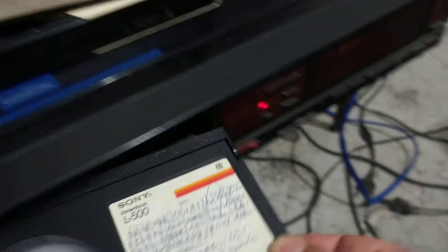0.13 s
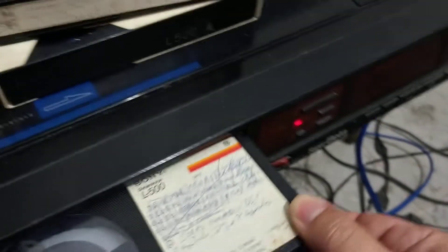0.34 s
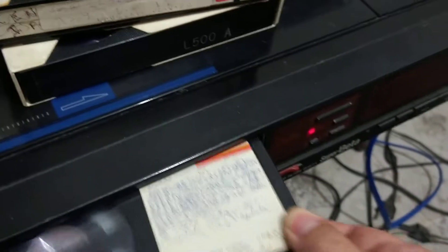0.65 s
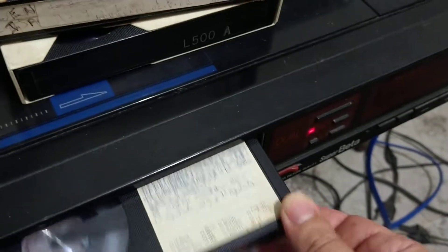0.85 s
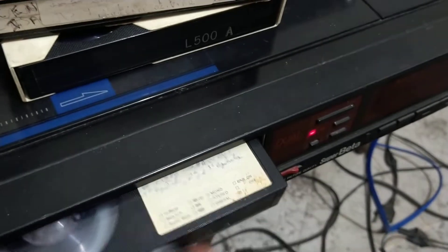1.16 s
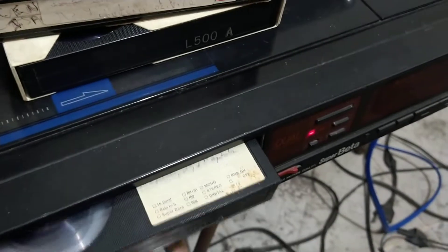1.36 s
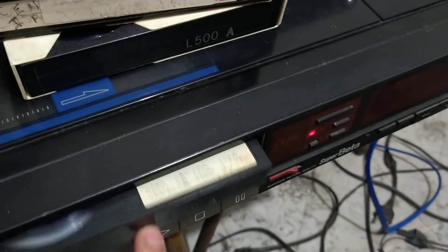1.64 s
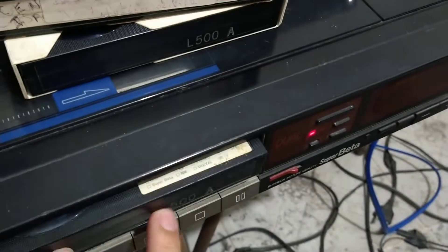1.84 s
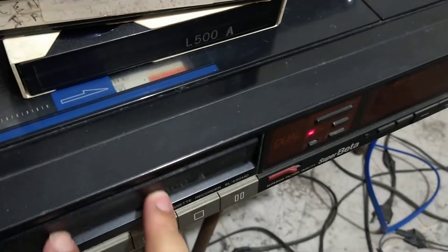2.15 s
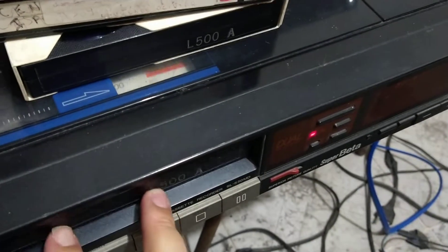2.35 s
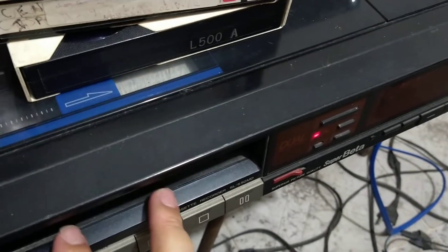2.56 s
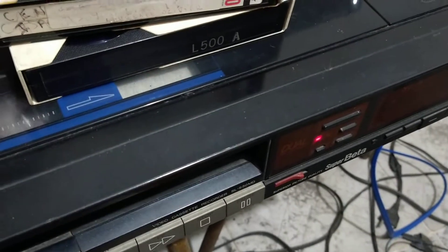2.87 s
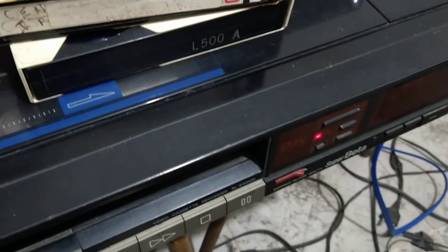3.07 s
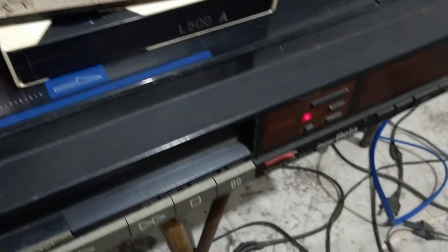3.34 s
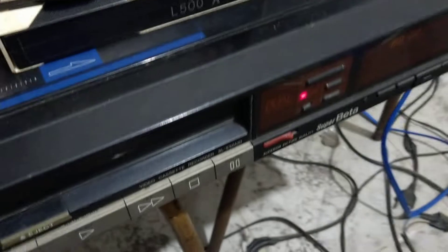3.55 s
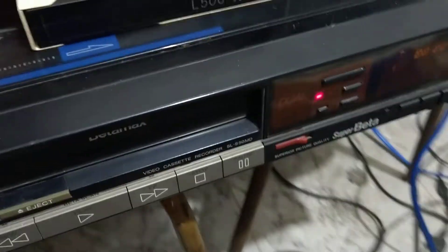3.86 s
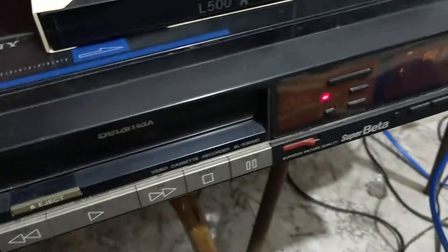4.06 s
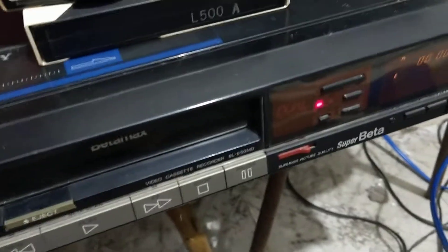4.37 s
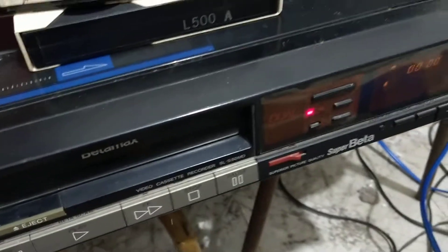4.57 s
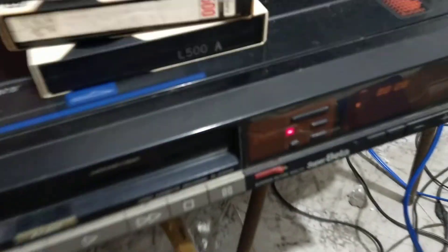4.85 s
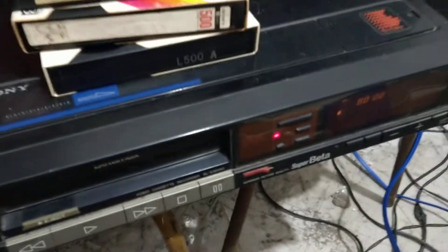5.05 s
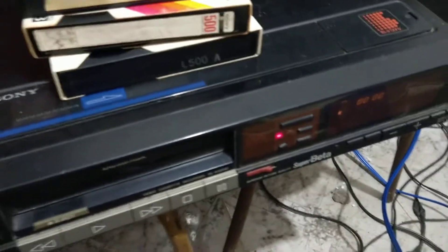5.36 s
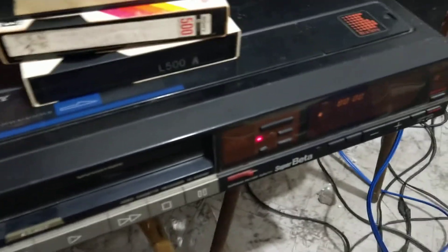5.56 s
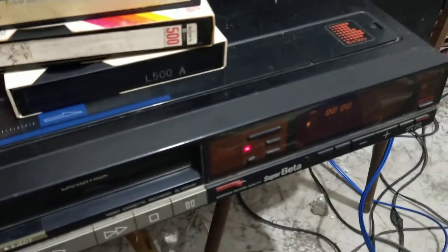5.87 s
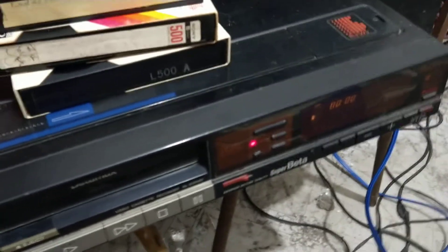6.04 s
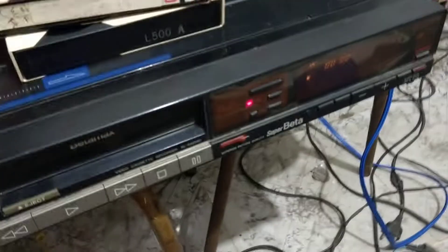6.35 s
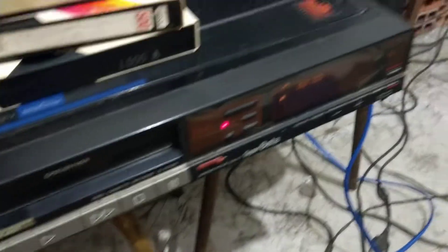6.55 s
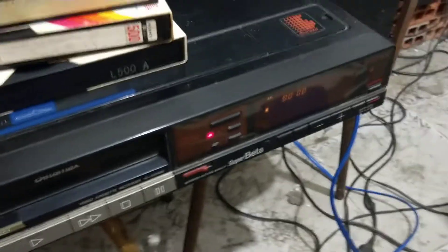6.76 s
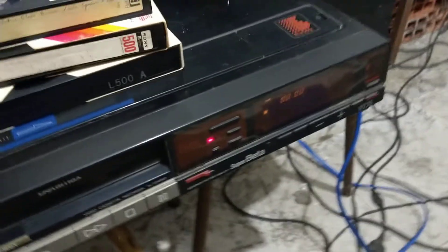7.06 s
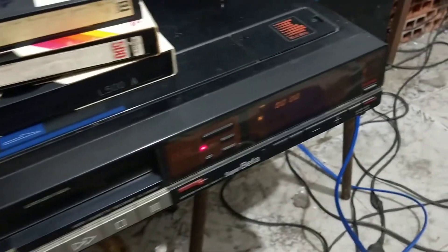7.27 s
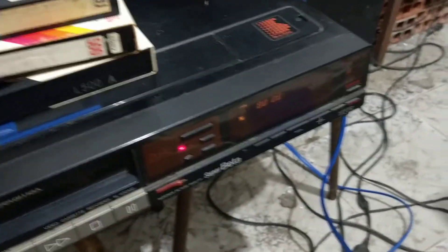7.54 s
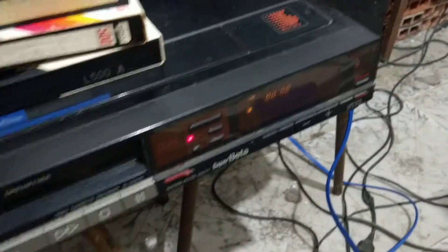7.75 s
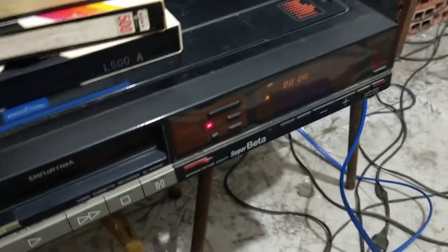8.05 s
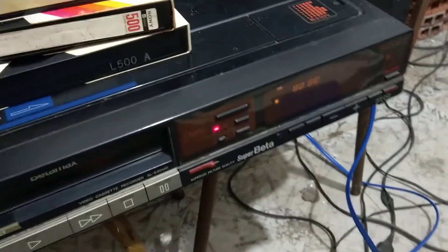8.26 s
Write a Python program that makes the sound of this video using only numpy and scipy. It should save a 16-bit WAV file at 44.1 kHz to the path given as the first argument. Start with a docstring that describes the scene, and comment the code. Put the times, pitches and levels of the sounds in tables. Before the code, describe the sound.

Close up, plastic knocks and scrapes, a firm clunk, a rattling motor whir, hard clacks, then two quieter geared whirs and small ticks.

```python
"""A small room with a tape machine: a hand slides a plastic cassette in, and it knocks on the flap and guides.
A lift motor draws it in, then a threading motor whirs twice through its gears, with latches clacking between.
Blows ring banks of resonances; rubbing, brushes and gears are modulated noise; meshing teeth are gliding tones.
A low throbbing hum lies behind. Two microphone ports hear the machine, the left one louder in most bands."""
import sys
import numpy as np
from scipy.fft import rfft, irfft, next_fast_len
from scipy.io import wavfile
from scipy.ndimage import map_coordinates

SR = 44100
rng = np.random.default_rng(int(sys.argv[2]) if len(sys.argv) > 2 else 0)


def store_wav(level_fs):
    """Save 16-bit WAV to argv[1]."""
    pcm = np.round(np.clip(np.atleast_2d(level_fs), -1, 1) * 32767)
    wavfile.write(sys.argv[1], SR, pcm.T.astype(np.int16))


N = 370881

# Blows of cassette, flap, levers and latches. Each row: start in seconds, level in dB, thud trim in dB,
# snap trim in dB, rattle in dB re the first crack.
BLOWS = [ (.001, -37.5, 1.5, -7, -7), (.061, -30.5, 7, -2, -12.5), (0.069, -23.5, -7, 3, -4.5),
         (0.245, -37, 9, -11, -5.5), (.312, -27.5, 8, -12, -14), (0.415, -26.5, -1.5, -1, -11),
         (0.453, -55.5, 20.5, 1, -33), (0.626, -35.5, 10, -8, -13), (0.65, -28.5, 4.5, -5.5, -8.5),
         (0.721, -32, 0, -7.5, -1), (.75, -37, 9, -5, -11), (.765, -43, 15, -10, -22),
         (.843, -43, 4, -4, -12), (.89, -38, 2.5, -26, -4.5), (1.025, -32, 6, -13, -13),
         (1.298, -46, 2, 3, -8), (1.657, -43, -17, -1, -8), (1.701, -32, -4, -2.5, -4.5),
         (1.716, -43, 16, -6, -28), (1.737, -34.5, 0, 1, -2.5), (1.7447, -14, -3, -9.5, -16.5),
         (1.999, -49.5, 2.5, 7, -16.5), (2.176, -46.5, 1, -9, 0), (2.799, -24, -3, 7, -9.5),
         (2.966, -35.5, 8, 2, 5), (3.013, -26, 7, -1, -4.5), (3.16, -29, 5.5, -6, -11),
         (3.193, -29.5, 9, -18, -17.5), (3.296, -22.5, -3, 8, -11), (3.347, -44, 8.5, 4.5, 2.5),
         (3.447, -57, -11, 8, -8), (3.727, -49, 0, -6, -3), (3.879, -48, -9, -0.5, -5.5),
         (3.964, -43.5, -7.5, 2.5, 6.5), (3.99, -37, -10, 8.5, -7), (4.657, -28.5, -30, 10.5, -14),
         (5.153, -17.5, -4.5, 9, -5), (5.38, -51, -2, 4, 8), (6.136, -42, 0, -5.5, 3.5),
         (6.6, -41.5, 0, -3, 1.5), (6.94, -50, -0.5, -6.5, -1), (7.211, -60.5, -11, -9, 12),
         (7.327, -46.5, -2, -6, 2), (7.516, -47, -7.5, 4.5, 4.5), (7.543, -36.5, -1, 8, -8.5),
         (7.552, -34.5, -4.5, 6, -5), (7.748, -33, -7, 0, 2), (7.771, -37, 0, 4.5, -8.5),
         (8.025, -50, 11, -25, -4)]
# Modes a blow rings. Each row: centre in Hz, width in Hz, level in dB.
CABINET_MODES = [(182, 80, -11.5), (404, 147, -2.5), (503, 77, 0), (691, 154, 1), (807, 207, 3),
                 (1075, 360, -7.5)]
SHELL_MODES = [(1405, 700, -1), (1846, 540, 4.5), (2440, 1150, -1.5), (3077, 180, 1), (4540, 2800, -9.5)]
CHASSIS_MODES = [(5640, 1300, -12.5), (7860, 2700, 1.5), (9520, 3240, 0), (9840, 1930, 2),
                 (13400, 10000, -14.5)]
SHELL_RATTLE_T60_S = 0.26  # for a rattle of 0 dB or more
LIFE_DB_PER_RATTLE_DB = 0.32

# Plastic sliding on plastic. Each row: start, peak and end in seconds, hiss in dB, body in dB re hiss.
STROKES = [(0.17, 0.27, 0.5, -57, 13.5), (0.842, 0.913, 1.04, -63, 17), (0.855, 1.022, 1.08, -49, -5),
           (1.19, 1.293, 1.46, -58.5, 1), (1.34, 1.372, 1.482, -41.5, -35), (1.481, 1.54, 1.6, -48, -11.5),
           (1.593, 1.7, 1.75, -50, -6), (6.9, 7.075, 7.22, -78, 24), (7.842, 8.148, 9.2, -66, -21)]
STROKE_FADE_DB = 23.5  # start and end under the peak
# Sliding spectra. Each row: frequency in Hz, relative level in dB per Hz.
SLIDE_HISS_SPECTRUM = [(1470, -23.5), (2920, -18), (4240, -13), (7530, -14.5), (9150, -8.5), (16000, -24.5)]
SLIDE_BODY_SPECTRUM = [(88, -42.5), (150, -2), (506, -3.5), (692, 0.5), (2300, -14), (4300, -40),
                       (6600, -120)]

# Motor runs; the threading motor goes out and back. Each row: on and off in seconds, brush hiss in dB,
# gear rattle in dB, spin-up in seconds, coasting in dB per second.
LIFT_RUNS = [(2.155, 3.29, -35.5, -39, 0.077, 159.5)]
THREAD_RUNS = [(3.98, 5.15, -39, -44, 0.076, 339), (5.375, 6.58, -42.5, -45.5, 0.066, 337)]
# Motor spectra. Each row: frequency in Hz, relative level in dB per Hz.
LIFT_HISS_SPECTRUM = [(2940, -25.5), (5000, -23), (6570, -6.5), (8380, -2.5), (9190, -7), (10200, -2.5),
                      (12800, -17.5), (16000, -27)]
LIFT_GEAR_SPECTRUM = [(120, -35), (280, -15.5), (400, -5), (2400, -7), (3450, -17), (5500, -18.5),
                      (7500, -62.5)]
THREAD_HISS_SPECTRUM = [(3500, -50.5), (5600, -19), (6600, -9), (9200, -7), (10050, -2), (10900, -7.5),
                        (11600, -2.5), (12300, -16.5), (13300, -22), (16000, -34.5)]
THREAD_GEAR_SPECTRUM = [(120, -28), (270, -16.5), (400, -15.5), (900, -7), (2900, -12), (3450, -19.5),
                        (5500, -21), (7500, -63.5)]
# Gearbox resonances, added to the plain rattle. Each row: centre in Hz, width in Hz, level in dB.
LIFT_BOX_MODES = [(1030, 45, 3), (1596, 66, 2.5), (1830, 40, 5.5), (2170, 32, 5)]
THREAD_BOX_MODES = [(395, 54, 7.5), (480, 58, 4.5), (784, 30, 6), (886, 42, 8), (998, 34, 7), (1398, 24, 6),
                    (1832, 32, 4.5)]
# Resonances that come and go as the carriage travels. Each row: centre in Hz, width in Hz,
# list of (time in seconds, level in dB).
CARRIAGE_RINGS = [(2200, 490, [(2.4, -24), (2.72, 2), (2.95, -1), (3.15, -20)]), (9950, 1400, [(2.85, -24),
                  (3.0, -1.5)]), (12600, 870, [(2.35, -15), (2.7, 5), (2.9, -14)])]
SHAFT_MEAN_HZ = 66.3
SWITCH_ON_DB, GEAR_DB_PER_HISS_DB = -19, 0.82  # hiss at switch-on re full speed; rattle follows
COAST_S = .5  # time until still

# Motor speed as tooth-mesh pitch. Each row: time in seconds, pitch in Hz, whine in dB before its swells.
LIFT_MESH = [(2.156, 1102, -77), (2.42, 1291, -53.5), (2.67, 1161, -50), (2.949, 1056, -49.5),
             (3.17, 1169, -55), (3.27, 1045, -48), (3.35, 801, -54.5), (3.41, 770, -46), (3.47, 700, -70)]
THREAD_MESH = [(4.15, 890, -72), (5.149, 857, -71), (5.41, 762, -64.5), (5.485, 783, -73),
               (5.517, 793.4, -55.5), (5.549, 850, -73), (5.63, 870, -59.5), (5.71, 888, -67),
               (5.8, 876, -57.5), (5.98, 867, -58.5), (6.03, 804, -53), (6.09, 891, -70), (6.3, 983, -66),
               (6.44, 958, -62), (6.56, 901, -52)]
# Panels that sing as the mesh passes, added to the plain tone. Each row: centre in Hz, width in Hz, level in dB.
PANEL_MODES = [(785, 16, 17), (880, 30, 19), (975, 60, 9), (1700, 170, 13), (2230, 280, 21)]
BEAD_HZ, BEAD_CREST_S = 16, 5.64  # swells of the whine

# Knocks on a small flap spring. Each row: start in seconds, level in dB.
SPRING_PINGS = [(0.727, -35), (0.844, -43), (1.025, -36.5), (3.297, -28)]
# The cassette drags over the spring. Row: start, peak and end in seconds, level in dB.
SPRING_DRAG = (.8, .97, 1.12, -59)
SPRING_HZ, SPRING_T60_S = (4240, 4400), .06  # pair of modes, before detuning

# Low hum. Each row: time in seconds, level in dB before its throb.
HUM_LEVELS = [(0, -62), (2.0, -65), (3.3, -58.5), (3.9, -66.5), (4.6, -57), (5.3, -83.5)]
HUM_MEAN_HZ = 82.3
THROB_HZ, THROB_DIP_S = 2.44, .22  # rate, one dip
# Background spectra. Each row: frequency in Hz, relative level in dB per Hz.
RUMBLE_SPECTRUM = [(25, -57.5), (60, -13.0), (150, -15.0), (600, -57.0)]
ROOM_SPECTRUM = [(25, -46), (60, -7), (120, 2), (220, -9), (450, 1), (600, -8), (1900, -12.5), (5200, -19),
                 (10000, -14.5), (16000, -35.5)]
ROOM_MEAN_DB = -66.5

# The ports. Each row: frequency in Hz, left-right correlation.
PORT_LIKENESS = [(60, 0.77), (250, 1), (1000, 0.29), (2000, 0.18), (12000, 0.095)]
# Each row: frequency in Hz, left re right in dB.
PORT_BALANCE = [(200, 1.2), (700, 1.5), (2000, 6.5), (4400, 0), (8100, -0.5), (15000, 10.5)]
RIGHT_LAG_SAMPLES, TOP_HZ = 10, 16000


def contacts():
    """Each blow is a crack, a burst of chatter and a longer rattle, ringing cabinet, shell and chassis."""
    size = 2 ** 14
    out, t_s, hz = np.zeros((2, N + size)), np.arange(size) / SR, np.fft.rfftfreq(size, 1 / SR)
    banks = [resonances(modes, hz) for modes in (CABINET_MODES, SHELL_MODES, CHASSIS_MODES)]
    bounce = amp(1.6 * wobble(260)) * pair()  # loose parts
    bounce = np.pad(bounce, ((0, 0), (0, size)))
    chatter = amp(-60 * t_s / 0.021)
    for start_s, db, thud_db, snap_db, rattle_db in BLOWS:
        i = round(start_s * SR)
        rise_s = 0.0031 * amp(0.63 * rattle_db)  # rattling blows build up slower
        onset = 1 - np.exp(-t_s / rise_s)
        rattle_t60_s = SHELL_RATTLE_T60_S * amp(LIFE_DB_PER_RATTLE_DB * min(rattle_db, 0))
        ring = 0
        bank_db = (thud_db - 6.5, -6, snap_db - 5.5)
        for bank, part_db, life in zip(banks, bank_db, (1.2, 1.0, .9)):  # the big cabinet rattles longest
            rattle = amp(rattle_db - 60 * t_s / (life * rattle_t60_s))
            force = (chatter + rattle) * onset * bounce[:, i:i + size]
            force[:, 0] += 4.5  # first touch
            mode_gain = amp(rng.normal(0, 2.2, len(bank)))  # each spot struck favours other modes
            if bank is banks[0]:
                mode_gain[0] *= amp(0.35 * thud_db)  # soft heavy blows reach the deepest mode
            ring = ring + amp(db + part_db) * rfft(force) * (mode_gain @ bank)
        out[:, i:i + size] += irfft(ring * port_lean(hz), size) * (t_s < .33)
    return out[:, :N]


def slides():
    """Rubbing is grainy hiss over a duller scrape of the shell."""
    hiss = coloured(amp(3 * wobble(400)) * pair(), SLIDE_HISS_SPECTRUM)
    body = coloured(amp(4.5 * wobble(70)) * pair(), SLIDE_BODY_SPECTRUM)
    out = 0
    for row in STROKES:
        db, body_db, gate = curves(stroke(*row))
        out = out + gate * amp(db) * (hiss + amp(body_db) * body)
    return out


def stroke(start_s, peak_s, end_s, db, body_db):
    """A stroke swells to its peak and fades, linearly in dB."""
    edge_db = db - STROKE_FADE_DB
    return [(start_s, edge_db, body_db), (peak_s, db, body_db), (end_s, edge_db, body_db)]


def motor(runs, hiss_spectrum, gear_spectrum, box_modes, throb_db, rough_db, sway_db, rings=()):
    """Brushes hiss and gears rattle in their box, both kicked once per turn of an unsteady shaft."""
    turn = 2 * np.pi * np.cumsum(SHAFT_MEAN_HZ * (1 + .04 * wobble(5))) / SR
    # tight spot on the shaft, uneven from turn to turn
    kick = unit(np.exp(1.5 * np.cos(turn))) * amp(1.5 * wobble(40))
    slow_wheel = .45 * np.sin(turn / 4)
    swell_db = throb_db * (kick + slow_wheel) + sway_db * wobble(25)

    # many small casing resonances, about 140 Hz apart
    casing_db = 2.5 * rng.standard_normal(160)
    casing_hz = np.linspace(0, SR / 2, len(casing_db))
    brushes = amp(swell_db + rough_db * wobble(300)) * pair()
    brushes = filtered(brushes, lambda hz: amp(np.interp(hz, casing_hz, casing_db)))
    hiss = coloured(brushes, hiss_spectrum)

    gears = amp(.4 * swell_db + rough_db * wobble(200)) * pair()
    gear = coloured(filtered(gears, lambda hz: peaks(box_modes, hz)), gear_spectrum)

    for centre_hz, width_hz, rows in rings:  # the carriage moves and other parts take up the sound
        ring = lambda hz: width_hz ** 2 / (width_hz ** 2 + 4 * (hz - centre_hz) ** 2)
        gain = amp(curves(rows)[0])
        hiss = hiss + gain * filtered(hiss, ring)
        gear = gear + gain * filtered(gear, ring)
    out = 0
    for hiss_db, gear_db, gate in map(curves, runs):
        out = out + gate * (amp(hiss_db) * hiss + amp(gear_db) * gear)
    return out


def running(runs, mesh, hiss_db_per_octave, gear_db_per_octave):
    """Runs spin up, follow their speed and coast: rows (s, hiss dB, rattle dB) and rows (s, Hz, whine dB)."""
    levels, tones = [], []
    mesh_s, mesh_hz, mesh_db = np.transpose(mesh)
    for on_s, off_s, hiss_db, gear_db, spin_s, coast_db_per_s in runs:
        s = np.arange(on_s, off_s + COAST_S, .005)
        hz, whine_db = np.interp(s, mesh_s, mesh_hz), np.interp(s, mesh_s, mesh_db)
        start_db = SWITCH_ON_DB * np.exp(-((s - on_s) / spin_s) ** 2 / 2)
        stop_db = -coast_db_per_s * np.maximum(s - off_s, 0)
        octaves = np.log2(hz / hz.mean())
        run_hiss_db = hiss_db + start_db + stop_db + hiss_db_per_octave * octaves
        run_gear_db = gear_db + GEAR_DB_PER_HISS_DB * (start_db + stop_db) + gear_db_per_octave * octaves
        levels.append(np.c_[s, run_hiss_db, run_gear_db])
        tones.append(np.c_[s, hz, whine_db + stop_db])
    return levels, tones


def whine(runs, octave_db, flutter, bead_db):
    """Teeth mesh in a wavering, beady tone with an octave; both swell where they meet a panel."""
    out = np.zeros(N)
    bead = np.cos(2 * np.pi * BEAD_HZ * (np.arange(N) / SR - BEAD_CREST_S))  # off-centre wheel
    for hz, db, gate in map(curves, runs):
        phase = 2 * np.pi * np.cumsum(hz * (1 + flutter * wobble(60))) / SR
        level_db = db + 1.5 * wobble(14) + 2 * wobble(35) + bead_db * bead
        tone = peaks(PANEL_MODES, hz) * np.sin(phase)
        octave = amp(octave_db) * peaks(PANEL_MODES, 2 * hz) * np.sin(2 * phase)
        out += gate * amp(level_db) * (tone + octave)
    return out * amp([[1.2], [-1.2]])


def spring():
    """Short beating pings of a close pair of modes, and their grainy whistle when rubbed."""
    out, t_s = np.zeros(N), np.arange(SR // 5) / SR
    detunes = rng.normal(1, .01, (len(SPRING_PINGS), 2))
    for (start_s, db), detune in zip(SPRING_PINGS, detunes):
        ring = np.sin(2 * np.pi * np.outer(detune * SPRING_HZ, t_s)).mean(0)
        envelope = amp(db - 60 * t_s / SPRING_T60_S) * (1 - np.exp(-t_s / 0.00065))
        out[round(start_s * SR):][:len(t_s)] += envelope * ring
    db, _, gate = curves(stroke(*SPRING_DRAG, 0))
    grains = amp(5 * wobble(90)) * rng.standard_normal(N)
    rub = filtered(grains, lambda hz: 1 / (1 + ((hz - np.mean(SPRING_HZ)) / 260) ** 4))
    return out + gate * amp(db) * unit(rub)


def groan():
    """A lever drags under load: a short rough low note of wavering pitch and level."""
    middle_s, spread_s, mean_hz, mean_db = 6.16, .03, 385, -44
    phase = 2 * np.pi * np.cumsum(mean_hz * (1 + .02 * wobble(50))) / SR
    swell = np.exp(-((np.arange(N) / SR - middle_s) / spread_s) ** 2 / 2)
    return amp(mean_db + 2.8 * wobble(60)) * swell * np.sin(phase)


def room():
    """A throbbing low hum with its rumble over the still air of the room."""
    db, gate = curves(HUM_LEVELS)
    phase = 2 * np.pi * np.cumsum(HUM_MEAN_HZ + .7 * wobble(4)) / SR
    # throb, as from a weaker neighbour tone
    throb = 1 - .45 * np.cos(2 * np.pi * THROB_HZ * (np.arange(N) / SR - THROB_DIP_S))
    hum = amp(2 * wobble(5)) * throb * np.sin(phase)
    rumble = amp(-7.5) * coloured(pair(), RUMBLE_SPECTRUM)
    air = amp(ROOM_MEAN_DB + wobble(0.94)) * coloured(pair(), ROOM_SPECTRUM)
    return gate * (amp(db) * hum + amp(db[gate > 0].mean()) * rumble) + air


def amp(db):
    """Gain of a level in dB."""
    return 10 ** (np.asarray(db) / 20)


def unit(x):
    """x at rms 1."""
    return x / np.sqrt(np.mean(x ** 2) + 1e-20)


def along(points, hz):
    """(Hz, value) points interpolated on a log axis."""
    point_hz, values = np.transpose(points)
    return np.interp(np.log(hz + 1), np.log(point_hz + 1), values)


def curves(rows):
    """One value per sample for each column, and a gate that is open while the table lasts."""
    s, *columns = np.transpose(rows)
    t_s = np.arange(N) / SR
    gate = np.clip(np.minimum(t_s - s[0], s[-1] - t_s) / 0.019, 0, 1)
    return [np.interp(t_s, s, column) for column in columns] + [gate]


def wobble(knots_per_s):
    """A smooth random curve through normal knots."""
    knots = rng.standard_normal(int(N * knots_per_s / SR) + 4)
    return map_coordinates(knots, [np.arange(N) * knots_per_s / SR])


def filtered(x, response):
    """x through a complex response of frequency."""
    m = next_fast_len(N + 8192)
    return irfft(rfft(x, m) * response(np.fft.rfftfreq(m, 1 / SR)), m)[..., :N]


def pair():
    """White noise at two ports, alike in the bass and less so in the treble."""
    def mid_side(hz):
        angle = np.arccos(np.clip(along(PORT_LIKENESS, hz), -1, 1)) / 2
        return np.array([np.cos(angle), np.sin(angle)])
    mid, side = filtered(rng.standard_normal((2, N)), mid_side)
    return np.array([mid + side, mid - side])


def port_lean(hz):
    """Left and right gains, the balance split evenly between them."""
    return amp(np.outer([.5, -.5], along(PORT_BALANCE, hz)))


def coloured(x, spectrum):
    """x through a spectrum and the lean of the two ports, at rms 1."""
    return unit(filtered(x, lambda hz: amp(along(spectrum, hz)) * port_lean(hz)))


def peaks(modes, hz):
    """Flat gain of 1 plus one resonance peak a mode."""
    return 1 + sum(amp(db) * w * w / (w * w + 4 * (hz - c) ** 2) for c, w, db in modes)


def resonances(modes, hz):
    """One steep response a mode; together they pass white noise at rms 1."""
    each = []
    for k, (c, w, db) in enumerate(modes):
        bandpass = 1j * hz * w / (c * c - hz * hz + 1j * hz * w)
        each.append(amp(db) * bandpass ** 2 * 1j ** k)  # a quarter turn of phase from mode to mode
    each = np.array(each)
    return each / np.sqrt(np.mean(abs(each.sum(0)) ** 2))


def scene():
    """The machine and the room."""
    lift_levels, lift_tones = running(LIFT_RUNS, LIFT_MESH, hiss_db_per_octave=-2.5, gear_db_per_octave=-17.0)
    thread_levels, thread_tones = running(THREAD_RUNS, THREAD_MESH,
                                          hiss_db_per_octave=26.5, gear_db_per_octave=10.5)
    lift = motor(lift_levels, LIFT_HISS_SPECTRUM, LIFT_GEAR_SPECTRUM, LIFT_BOX_MODES,
                 throb_db=1.1, rough_db=1.8, sway_db=1, rings=CARRIAGE_RINGS)
    thread = motor(thread_levels, THREAD_HISS_SPECTRUM, THREAD_GEAR_SPECTRUM, THREAD_BOX_MODES,
                   throb_db=1.4, rough_db=1.4, sway_db=.9)
    lift_teeth = whine(lift_tones, octave_db=-8.5, flutter=.02, bead_db=2)
    thread_teeth = whine(thread_tones, octave_db=-7, flutter=.011, bead_db=7)
    return contacts() + slides() + lift + thread + lift_teeth + thread_teeth + spring() + groan() + room()


def record(dry):
    """The right port is further from the machine and hears later; nothing is kept above the band limit."""
    def ports(hz):
        band = np.clip((TOP_HZ - hz) / 250, 0, 1)
        return band * np.exp(-2j * np.pi * np.outer([0, RIGHT_LAG_SAMPLES], hz) / SR)
    return filtered(dry, ports)


dry = scene()
out = record(dry)
store_wav(out)
```